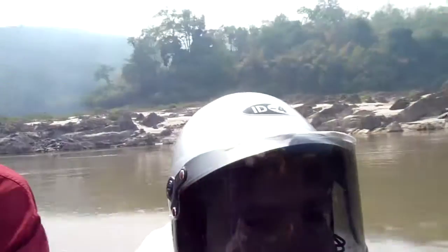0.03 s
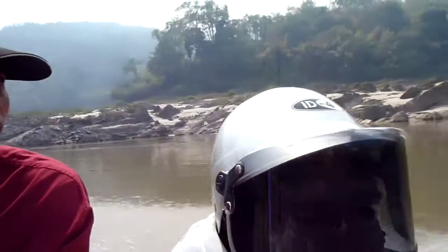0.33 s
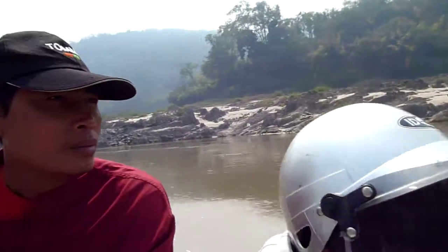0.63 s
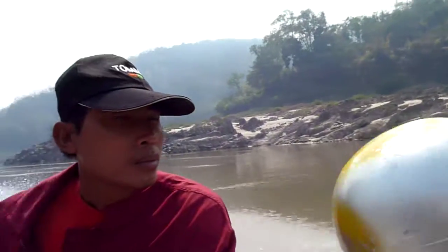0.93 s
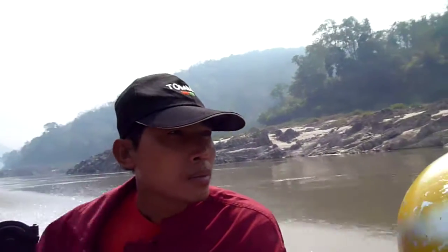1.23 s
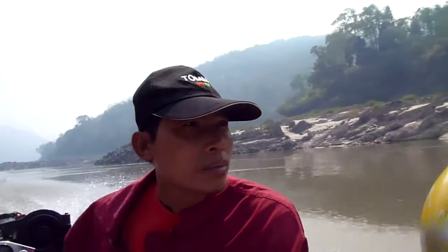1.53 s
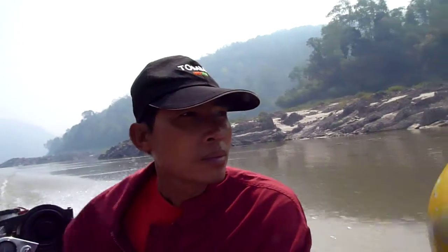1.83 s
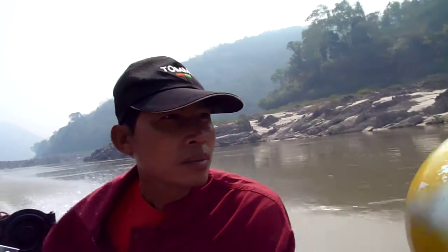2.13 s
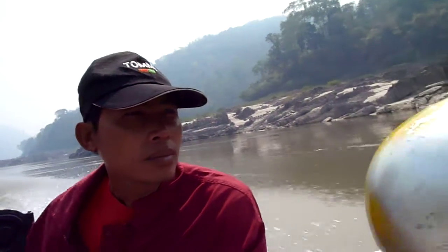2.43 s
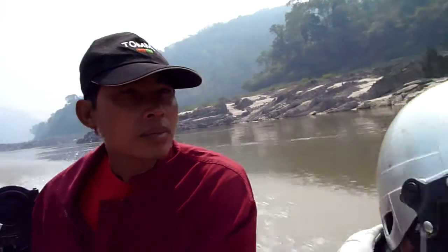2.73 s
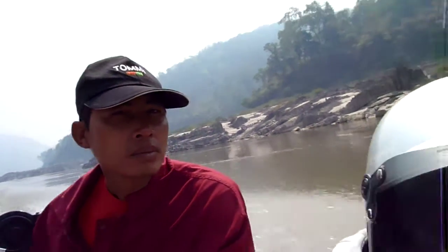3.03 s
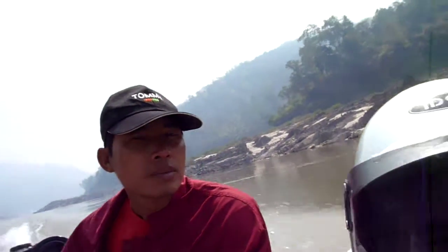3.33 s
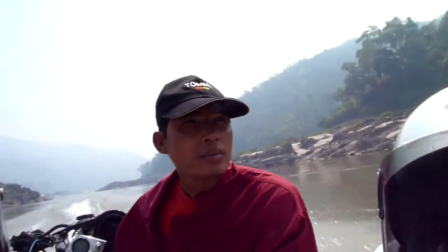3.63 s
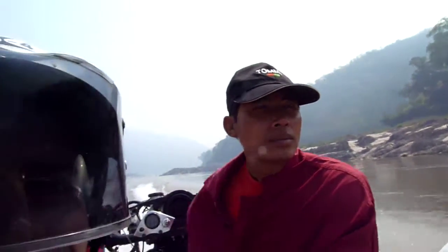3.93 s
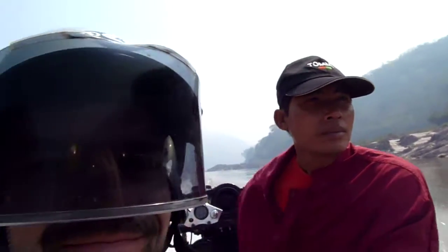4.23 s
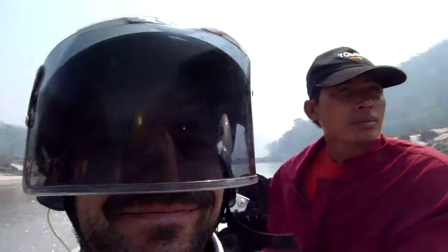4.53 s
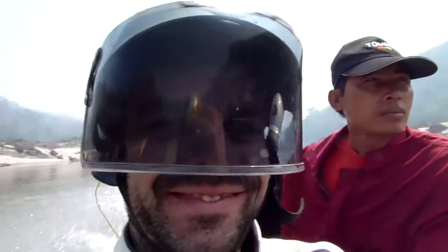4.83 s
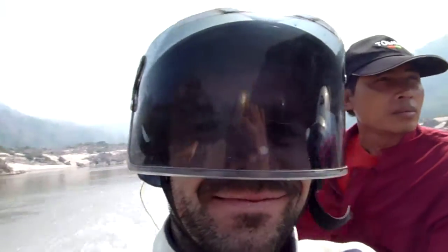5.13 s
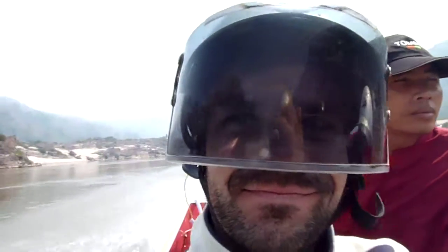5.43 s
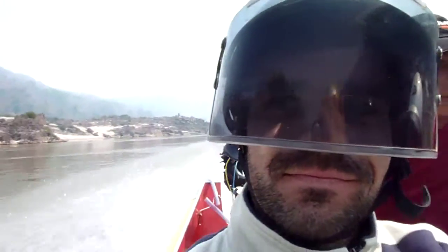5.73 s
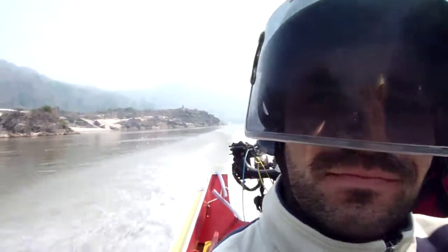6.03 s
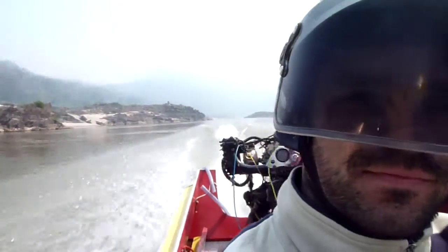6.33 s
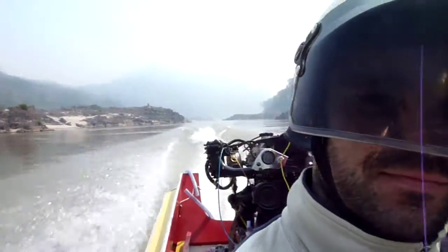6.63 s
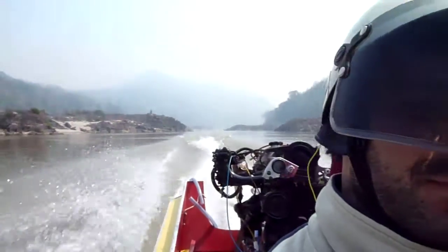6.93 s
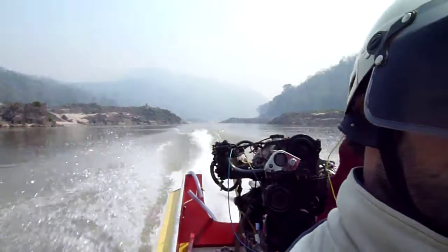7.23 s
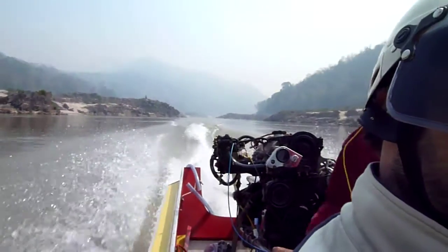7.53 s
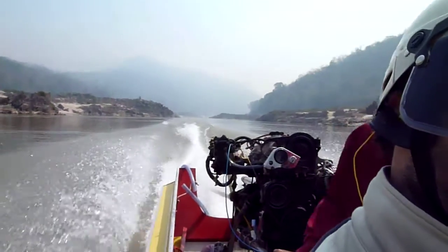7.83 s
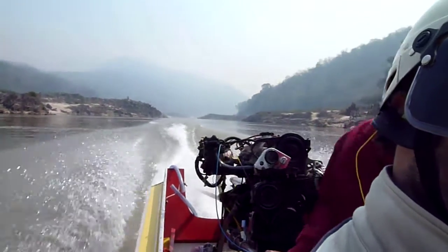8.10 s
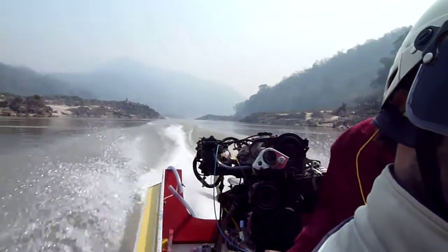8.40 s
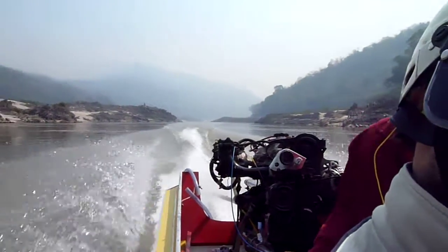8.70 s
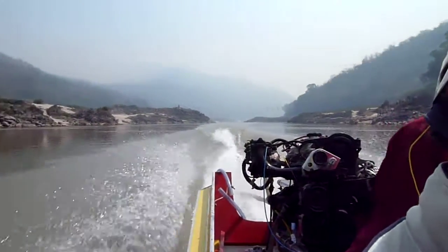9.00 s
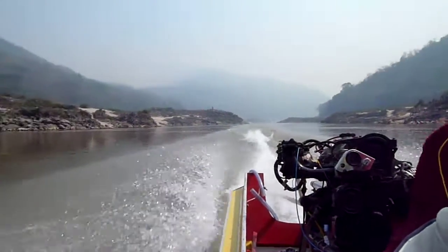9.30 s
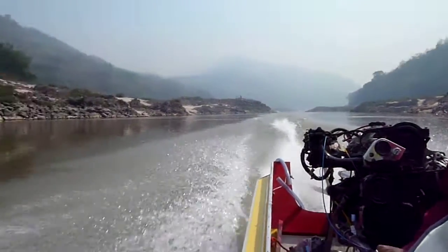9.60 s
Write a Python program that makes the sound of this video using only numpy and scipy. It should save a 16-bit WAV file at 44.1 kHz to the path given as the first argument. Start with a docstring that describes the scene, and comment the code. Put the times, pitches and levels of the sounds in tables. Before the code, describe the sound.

Gusting wind thumps and flutters against the microphone while a speedboat engine drones evenly underneath and its wake softly hisses.

```python
"""Wind hammers the microphone: a deep rumble, a tearing flutter and single hard buffets.
This is a seat in the open hull of a speedboat running flat out on a river. The headwind breaks into
eddies at the microphone port, bright in the open air and deep in the lee.
Under it the engine's firings drone at a steady speed, and the spray of the wake hisses,
growing louder as the microphone turns astern."""
import sys
import numpy as np
from scipy.fft import rfft, irfft, next_fast_len
from scipy.io import wavfile
from scipy.ndimage import uniform_filter1d, map_coordinates

SR = 44100
rng = np.random.default_rng(int(sys.argv[2]) if len(sys.argv) > 2 else 0)


def wav_out(sig):
    """Save sig, one row per channel (or a flat mono array), as 16-bit PCM at SR to the path in sys.argv[1]."""
    wavfile.write(sys.argv[1], SR, np.round(np.clip(np.atleast_2d(sig).T, -1, 1) * 32767).astype(np.int16))


N = 426006


def amp(db):
    """Decibels to gain."""
    return 10 ** (np.asarray(db) / 20)


def unit(x):
    """x at rms 1."""
    return x / np.sqrt(np.mean(x ** 2) + 1e-20)


def noise():
    """White noise of rms 1."""
    return rng.standard_normal(N)


def wobble(rate):
    """A smooth random modulator, rate knots a second."""
    knots = rng.standard_normal(int(N * rate / SR) + 4)
    return map_coordinates(knots, [np.arange(N) * rate / SR])


def automation(rows):
    """One curve, sample by sample, for each column after the time."""
    times, *columns = np.transpose(rows)
    return [np.interp(np.arange(N) / SR, times, column) for column in columns]


def swells(rows):
    """Smooth rises and falls, one for each row of peak t/s, length/s, height."""
    total = np.zeros(N)
    for t, length, height in rows:
        span = np.arange(max(0, int((t - length / 2) * SR)), min(N, int((t + length / 2) * SR)))
        total[span] += height * np.cos(np.pi * (span / SR - t) / length) ** 2
    return total


def filtered(x, response):
    """x through a frequency response, a function of f/Hz."""
    size = next_fast_len(N + 8192)
    return irfft(rfft(x, size) * response(np.fft.rfftfreq(size, 1 / SR)), size)[:N]


def eq(x, points):
    """x through an EQ curve of f/Hz, relative level/dB; white input keeps its level."""
    f, db = np.transpose(points)
    return filtered(x, lambda hz: unit(amp(np.interp(np.log(hz + 1), np.log(f), db))))


def steadied(gain, span_s):
    """A fluctuating gain with its power held at 1 over span_s."""
    return gain / np.sqrt(np.abs(uniform_filter1d(gain ** 2, int(span_s * SR))) + 1e-9)


def swirl(eddies_db, depth, flicker_db):
    """Noise that bunches into the peaks of the eddies, with a flicker of its own."""
    return noise() * steadied(amp(depth * eddies_db + flicker_db * wobble(170)), span_s=0.059)


def pressure_spikes(kicks, corner_hz, leak_hz=130, edge_hz=3900):
    """Each kick becomes a sharp suction spike that swings back as the air leaks past the port."""
    def response(f):
        leak = 1j * f / (leak_hz + 1j * f)
        return -leak / (1 + 1j * f / corner_hz) ** 2 / np.sqrt(1 + (f / edge_hz) ** 10)
    return filtered(kicks, response)


def eddy_hits(eddies_db, per_s, corner_hz):
    """Single eddies of uneven size hit the port, most often in the peaks of the flow."""
    rate = per_s * steadied(amp(0.8 * eddies_db), span_s=0.12)
    kicks = (rng.random(N) < rate / SR) * rng.uniform(0.28, 1, N)
    return unit(pressure_spikes(kicks, corner_hz))


# Gusts that swell and pass: peak t/s, rise/dB
GUSTS = [(.3, 3.5), (.5, 1), (0.701, 5), (0.871, 2), (1.19, 0.5), (1.83, 2), (2.02, 1.5), (2.32, 1.5),
         (2.45, 3), (2.66, 1), (3.5, 2), (4.2, -0.5), (4.78, 5.5), (5.0, 3), (5.42, 2.5), (5.82, 1.5),
         (5.97, 6), (6.115, 4.5), (6.54, 4), (6.85, 2.5), (7.0, 2.5), (7.19, 6), (7.37, 2.5), (7.67, 3.5),
         (8.33, 0.5), (8.43, 1), (8.74, 0.5), (8.9, 0), (9.12, 0.5), (9.38, 1.5), (9.58, 2.5)]
# Lulls where the stream lifts off the port: middle t/s, length/s, drop/dB
LULLS = [(0.062, 0.047, 3), (0.171, 0.047, 7.5), (0.22, 0.058, 9), (0.342, 0.051, 8), (0.455, 0.067, 5.5),
         (0.56, 0.082, 4), (1.944, 0.095, 2), (2.402, 0.088, 2.5), (2.524, .08, 1.5), (3.284, .06, 5),
         (3.41, 0.078, 4), (4.83, 0.15, 4), (4.964, 0.088, 4), (5.497, 0.053, 8), (5.9, 0.044, 2.5),
         (6.262, 0.066, 8), (6.33, 0.029, 12), (6.635, 0.13, 6.5), (7.55, 0.18, 2.5), (9.304, 0.086, 2.5)]


def gusting(gust_s=0.075, stall_s=0.026, stall_db=2, sway_db=0.94):
    """The stream's ride in dB: gusts, lulls, a brief stall before each buffet and a random sway."""
    gusts = swells((t, gust_s, db) for t, db in GUSTS)
    stalls = swells((t - stall_s / 2, stall_s, stall_db) for t, *_ in BUFFETS)
    return gusts - swells(LULLS) - stalls + sway_db * wobble(40)


# The stream across the turning microphone:
# t/s, strength/dB, exposure (0 in the lee, 1 in the open), gustiness (0 even, 1 lumpy)
STREAM = [(0, -0.5, 0.7, 0.99), (.52, 0, 0.82, 0.59), (.72, 3.5, 0.74, 0.28), (1.3, 2, .93, 0.42),
          (2.15, 3, 0.93, .3), (2.8, 0, .86, 0.58), (3.24, -2.5, 0.82, 0.68), (3.5, -1, 0.91, 0.22),
          (4.25, -1.5, 0.9, .45), (4.42, -4.5, 0.23, .8), (4.9, -6, 0.24, 0.97), (5.6, -1.3, 0, .92),
          (6.12, -1.8, 0, .95), (6.3, -5.3, 0.008, 0.83), (7.5, -5, 0.46, 0.67), (7.75, -5, 0.43, .5),
          (9.66, -4.5, 0.52, 0.6)]


def headwind():
    """Big eddies break into smaller ones; the finer the sound, the more it bunches into their peaks."""
    strength_db, exposure, gustiness = automation(STREAM)
    gust_db = gusting()
    eddies_db = gustiness * (1.7 * wobble(50) + 3.8 * wobble(135) + 3.2 * wobble(380) + 2 * wobble(1100))

    def fader(db, follow, gust, open_db):
        """A layer's gain: base level/dB, dB per dB of strength, dB per dB of gust, open-air lift/dB."""
        return amp(db + follow * strength_db + gust * gust_db + open_db * exposure)

    return (wind_rumble(fader, eddies_db) + wind_flutter(fader, eddies_db, strength_db)
            + wind_tearing(fader, eddies_db))


# EQ of the wind's sub boom and of the rumble above it: f/Hz, level/dB
BOOM_EQ = [(10, -22), (22, -9), (40, -2.5), (65, 5.5), (100, -14.5), (200, -31), (800, -93.5)]
RUMBLE_EQ = [(15, -29.5), (35, -13), (60, -9.5), (90, 0), (160, -1.5), (240, -4), (400, -13.5), (800, -43),
             (2000, -91)]
# How each rides the stream: settings for fader()
BOOM_RIDE = dict(db=-34.5, follow=0.19, gust=.2, open_db=-7)
RUMBLE_RIDE = dict(db=-26, follow=.55, gust=.5, open_db=-4)
# Low-end automation, which each layer follows in part: t/s, level/dB
LOW_END = [(0, 7.5), (.45, 1), (.75, -4.5), (1.25, -0.5), (2.2, -2.5), (2.8, -1), (3.3, 5), (4.2, 0.5),
           (5.15, 3.5), (6.3, -2.5), (7, -0.5), (8.3, -1.5), (9.66, -0.5)]


def wind_rumble(fader, eddies_db):
    """The wind's low end: a boom, a churning rumble and the soft knocks of large eddies passing."""
    bass_db, = automation(LOW_END)
    boom = fader(**BOOM_RIDE) * amp(0.92 * bass_db) * eq(noise(), BOOM_EQ)
    gain = fader(**RUMBLE_RIDE) * amp(0.6 * bass_db + 1.1 * wobble(24))
    rumble = amp(-1) * unit(eq(swirl(eddies_db, depth=0.59, flicker_db=1.56), RUMBLE_EQ))
    knocks = amp(-6.5) * eddy_hits(eddies_db, per_s=50, corner_hz=184)
    return boom + gain * (rumble + knocks)


# EQ of the flutter in a slow stream and of its roar in a fast one: f/Hz, level/dB
FLUTTER_EQ = [(80, -35.5), (200, -1), (320, 4.5), (600, 1), (1000, -6), (1500, -15), (2500, -36.5),
              (6000, -62.5)]
ROAR_EQ = [(80, -25), (200, 6), (350, -4), (700, 1.5), (1000, -1), (1500, -7), (2500, -31.5), (6000, -62)]
# How the flutter rides the stream: settings for fader()
FLUTTER_RIDE = dict(db=-31.5, follow=0.95, gust=1, open_db=2.5)


def wind_flutter(fader, eddies_db, strength_db):
    """The mids: a faster stream sheds smaller eddies, lifting the pitch; tight ones snap at the port."""
    fast = np.clip((strength_db + 1) / 8, 0, 1)
    churn = swirl(eddies_db, depth=0.99, flicker_db=1.5)
    flutter = (1 - fast) * unit(eq(churn, FLUTTER_EQ)) + fast * unit(eq(churn, ROAR_EQ))
    snaps = amp(-7.5) * eddy_hits(eddies_db, per_s=75, corner_hz=1150)
    return fader(**FLUTTER_RIDE) * (flutter + snaps)


# EQ of the tearing and of the sizzle on top: f/Hz, level/dB
TEARING_EQ = [(200, -17.5), (600, -7), (1100, 2.5), (1600, 1.5), (2200, -3), (3200, -12), (4300, -21),
              (5500, -27.5), (6500, -43), (7400, -45.5)]
SIZZLE_EQ = [(1000, -22), (2200, -7), (3200, 0), (4200, -3), (5400, -11), (6500, -19.5), (7400, -39.5)]
# How each rides the stream: settings for fader()
TEARING_RIDE = dict(db=-48.5, follow=0.55, gust=2.1, open_db=16.5)
SIZZLE_RIDE = dict(db=-62, follow=0.87, gust=1.7, open_db=16)
# Sizzle boosts, brief rasps and one longer, brighter stretch of wind: peak t/s, length/s, boost/dB
SIZZLE_BOOSTS = [(0.314, 0.089, 6), (0.427, 0.079, 10), (.5, 0.089, 8.5), (0.597, 0.093, 13),
                 (1.175, 0.19, 3), (2.742, 0.065, 8.5), (2.882, 0.073, 15.5), (2.985, 0.15, 6),
                 (3.85, .8, 6), (4.784, 0.065, 8)]


def wind_tearing(fader, eddies_db):
    """The top end: fine eddies tear and sizzle, most in the open air; at times the sizzle flares."""
    tearing = unit(eq(swirl(eddies_db, depth=1.39, flicker_db=3), TEARING_EQ))
    sizzle = unit(eq(swirl(eddies_db, depth=1.98, flicker_db=3.5), SIZZLE_EQ))
    return fader(**TEARING_RIDE) * tearing + fader(**SIZZLE_RIDE) * amp(swells(SIZZLE_BOOSTS)) * sizzle


def burst(attack_s, decay_s):
    """The envelope of one eddy striking, peak 1."""
    t = np.arange(SR // 10) / SR
    shape = (1 - np.exp(-t / attack_s)) * np.exp(-t / decay_s)
    return shape / shape.max()


# Hard wind hits, before each layer's trim: t/s, spike and slap level/dB, thump level/dB
BUFFETS = [(0.039, -15, -22.5), (0.091, -10, -24), (0.146, -22, -22), (0.187, -13, -19),
           (0.265, -10.5, -21.5), (0.289, -12.5, -14), (0.312, -12, -19.5), (0.398, -12.5, -26.5),
           (0.418, -10, -14), (0.441, -11, -27.5), (0.735, -11, -18), (0.849, -12, -32),
           (0.988, -12, -20.5), (1.212, -17, -14), (1.559, -16.5, -22), (1.641, -9.5, -25),
           (2.74, -12.5, -15.5), (2.88, -20.5, -18), (3.01, -5, -41), (3.174, -15, -25), (3.216, -19, -17),
           (3.332, -20, -12), (4.192, -9, -21), (4.316, -11, -28), (4.506, -24, -16.5), (4.78, -23, -22),
           (4.992, -21, -22.5), (5.156, -16, -22), (5.286, -19.5, -19.5), (5.335, -14.5, -16),
           (5.402, -20.5, -25), (5.458, -19, -27), (5.718, -18.5, -18), (5.739, -18, -18),
           (5.767, -18, -15), (5.86, -17.5, -13.5), (5.948, -13, -15.5), (6.092, -18.5, -27.5),
           (6.135, -19, -12.5), (6.183, -12.5, -14.5), (6.228, -26, -19), (6.286, -17, -28.5),
           (6.479, -15, -22.5), (6.676, -13.5, -17), (6.73, -12, -14.5), (6.823, -16, -25.5),
           (6.897, -18, -18.5), (7.088, -18, -26), (7.194, -17.5, -24.5), (7.494, -19, -19.5),
           (7.776, -14.5, -24), (8.021, -11.5, -32), (8.315, -14.5, -17.5), (8.735, -11.5, -25.5),
           (9.101, -16, -28)]


def buffets():
    """A strong eddy hits the port: a pressure spike, a short torn slap and a longer low thump."""
    kicks, slap_env, thump_env = np.zeros((3, N + SR))
    short, long = burst(attack_s=0.0002, decay_s=0.0027), burst(attack_s=0.0028, decay_s=0.0061)
    for t, hit_db, thump_db in BUFFETS:
        start = round(t * SR)
        kicks[start] += amp(hit_db + 22)
        slap_env[start:start + len(short)] += amp(hit_db - 9.5) * short
        thump_env[start:start + len(long)] += amp(thump_db - 3) * long
    thump = eq(thump_env[:N] * noise(), RUMBLE_EQ)
    return pressure_spikes(kicks[:N], corner_hz=900) + torn_slap(slap_env[:N]) + thump


# EQ of a buffet's slap: f/Hz, level/dB
SLAP_EQ = [(60, -17.5), (250, 8.5), (500, 3), (1000, 0.5), (1600, -6), (2600, -25.5), (4000, -25),
           (5500, -34.5), (7400, -51)]


def torn_slap(envelope):
    """Air slaps the port: a midrange body with a faint, bright torn edge."""
    return eq(envelope * noise(), SLAP_EQ) + amp(-20.5) * eq(envelope * noise(), SIZZLE_EQ)


# Partials of the engine drone: multiple of the firing rate, relative level/dB
ENGINE_ORDERS = [(.5, -10), (1, 6.5), (2, -15.5), (3, -15.5), (4, -15.5), (5, -20.5), (6, -27.5)]


def engine(firing_hz=164, drone_db=-42, exhaust_db=-60):
    """The firing rate barely wavers at full throttle; each firing also puffs rough exhaust noise."""
    rate_hz = firing_hz * (1 + 0.004 * wobble(2.5) + 0.004 * wobble(25))
    phase = 2 * np.pi * np.cumsum(rate_hz) / SR
    drone = sum(amp(db + 0.94 * wobble(12)) * np.sin(order * phase + rng.uniform(0, 2 * np.pi))
                for order, db in ENGINE_ORDERS)
    exhaust = eq(noise() * (1 + np.cos(phase)) ** 2, FLUTTER_EQ)
    return amp(drone_db) * unit(drone) + amp(exhaust_db) * unit(exhaust)


# EQ of the spray: f/Hz, level/dB
SPRAY_EQ = [(100, -0.5), (400, -1.5), (1000, -13.5), (2000, -24.5), (3100, -21.5), (3450, -20),
            (3850, -21.5), (4150, -27), (4650, -25), (5300, -30.5), (5800, -36.5), (6700, -42), (7400, -47)]
# How openly the stern is heard: t/s, relative level/dB
STERN_OPENNESS = [(0, -23), (4, -1.5), (4.6, -5), (6.2, -1), (7, 0.5), (8, 1), (9.66, 6)]


def wake():
    """Spray thrown from the hull hisses and swells a little, louder as the microphone turns astern."""
    stern_db, = automation(STERN_OPENNESS)
    return amp(stern_db - 45.5 + 0.36 * wobble(4.6)) * eq(noise(), SPRAY_EQ)


def scene():
    """The mono mix: wind on the microphone up front, engine and wake underneath."""
    return (headwind() + buffets() + engine() + wake())[None]


def record(dry):
    """A small microphone soft-clips the highest peaks and cuts the top end off steeply."""
    ceiling, top_hz = 0.43, 7250
    rounded = dry[0] / (1 + (dry[0] / ceiling) ** 4) ** (1 / 4)
    return filtered(rounded, lambda hz: 1 / np.sqrt(1 + (hz / top_hz) ** 80))[None]


dry = scene()
out = record(dry)
wav_out(out)
```